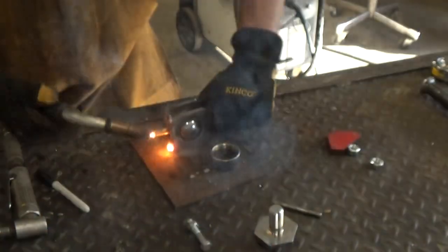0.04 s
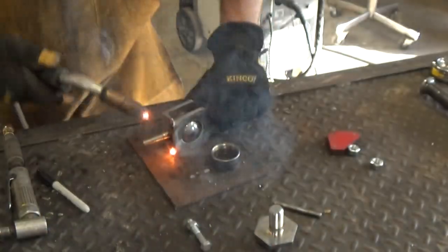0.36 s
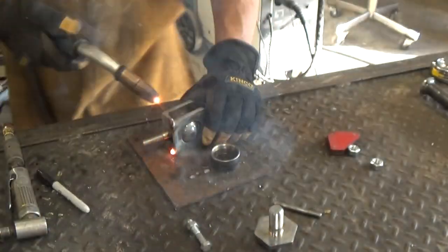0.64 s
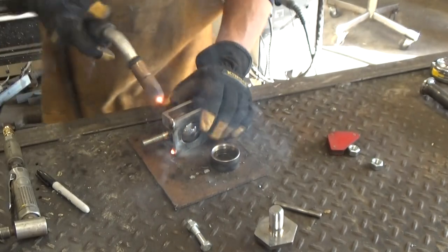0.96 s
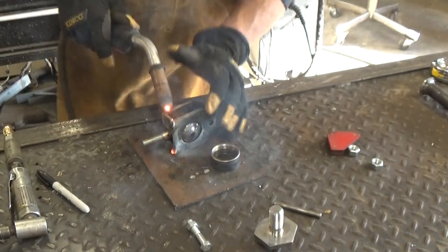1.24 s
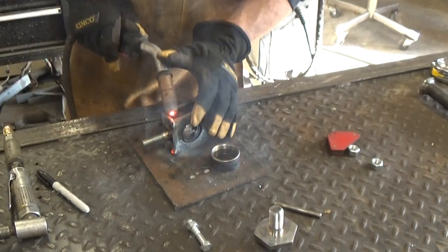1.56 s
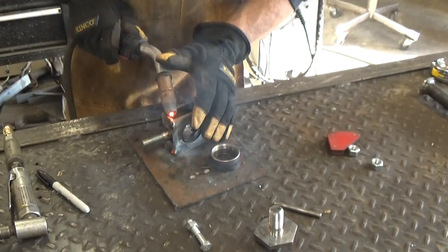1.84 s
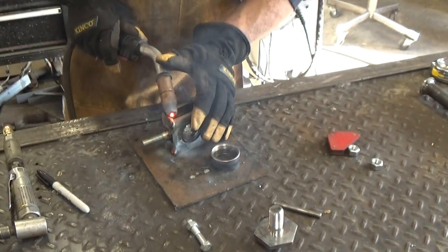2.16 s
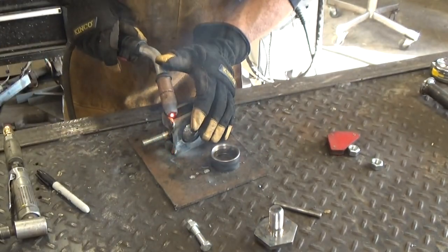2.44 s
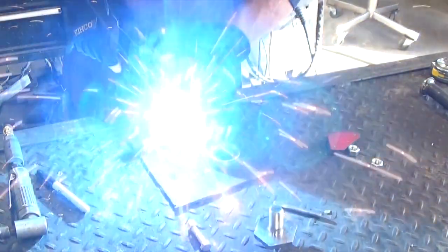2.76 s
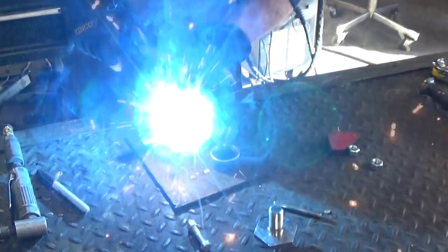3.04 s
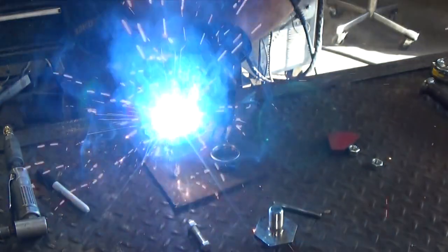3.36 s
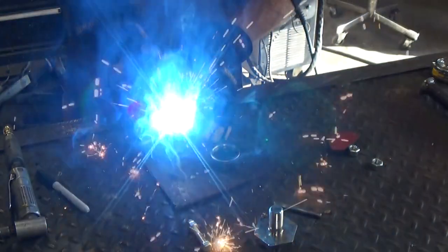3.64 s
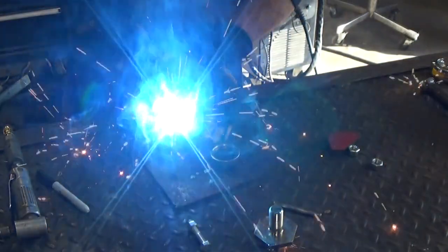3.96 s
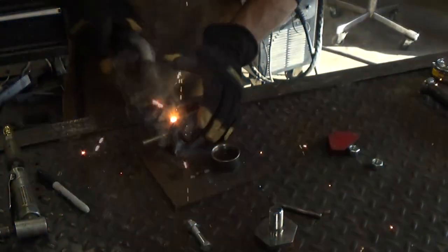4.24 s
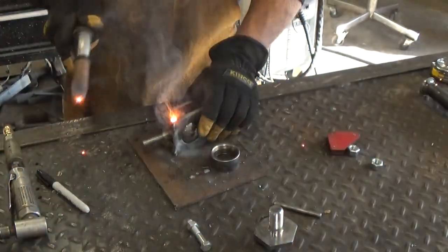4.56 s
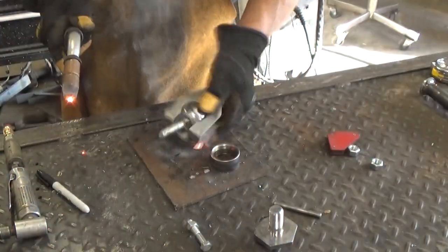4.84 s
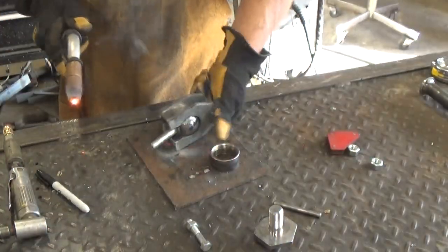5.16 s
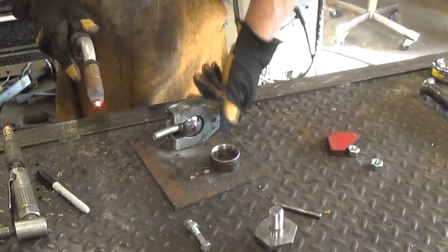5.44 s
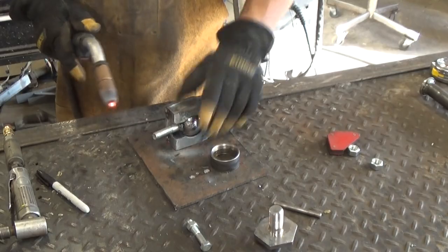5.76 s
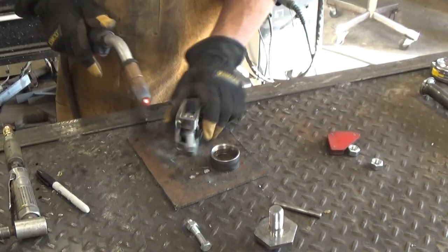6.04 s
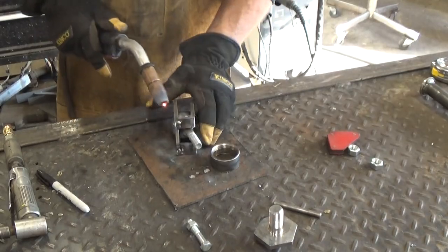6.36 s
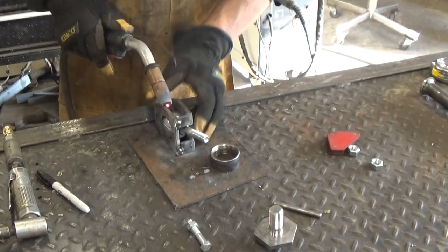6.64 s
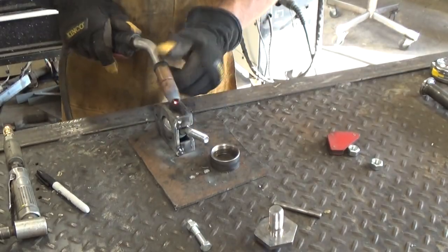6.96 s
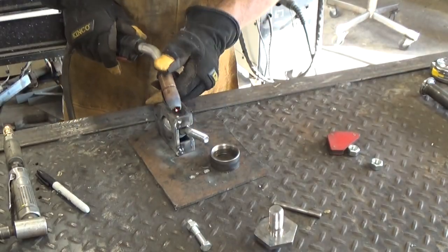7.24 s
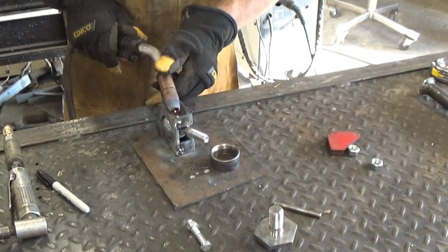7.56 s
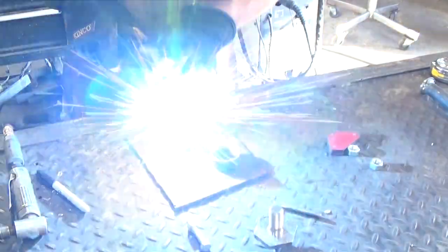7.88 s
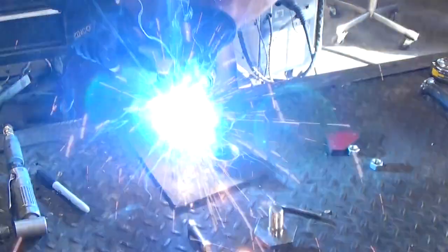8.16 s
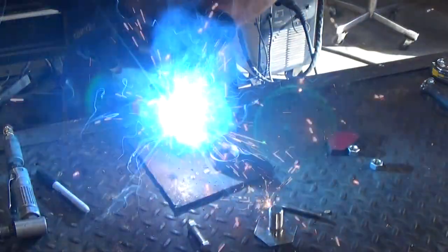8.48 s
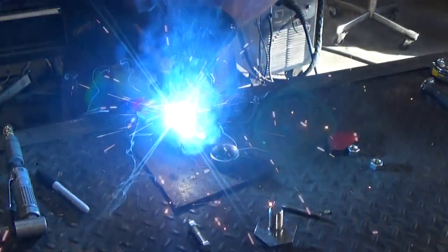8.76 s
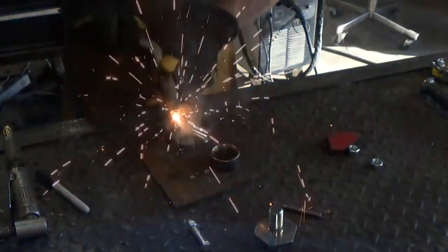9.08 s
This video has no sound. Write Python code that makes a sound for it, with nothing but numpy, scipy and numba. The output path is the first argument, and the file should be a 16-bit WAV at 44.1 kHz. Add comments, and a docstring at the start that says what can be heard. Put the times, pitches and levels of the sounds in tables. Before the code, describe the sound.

In a small workshop, a welding machine hums faintly under light metal taps and glove rustle. An arc strikes close by with sharp pops and runs as a fast, bright crackle and hiss for about a second and a half. A steel bracket then clanks over on a steel bench, clinks and slides briefly into place. After a short lull, a second weld of similar length crackles.

```python
"""Two short MIG welds in a small workshop

Close by, the welding wire dips into the melted steel about 115 times a second. Each dip is a short
circuit: it hushes the hiss of the electric arc and ends in a sharp pop. Between the two welds a gloved
hand tips a steel bracket over on the steel bench and slides it into place. The welder hums behind."""
import sys
import numpy as np
from scipy import signal
from scipy.fft import rfft, irfft
from scipy.io import wavfile
from scipy.ndimage import uniform_filter1d, minimum_filter1d, map_coordinates
from numba import njit

SR = 44100
rng = np.random.default_rng(int(sys.argv[2]) if len(sys.argv) > 2 else 0)


def to_wav(sig):
    """Store sig (one row per channel, or 1-D mono) as 16-bit WAV at the path in sys.argv[1].

    Samples outside -1..1 are clipped; the rate is SR.
    """
    pcm = np.clip(np.atleast_2d(sig), -1, 1) * 32767
    pcm = np.round(pcm).astype(np.int16)
    wavfile.write(sys.argv[1], SR, pcm.T)  # frames by channels


N = 410550
T = np.arange(N) / SR

# tone of the steel bench: f/Hz, level/dB
BENCH_COLOUR = [(25, -50), (45, -15), (70, -3.5), (95, -8), (135, -2.5), (200, -1.5), (300, -3),
                (420, -3.5), (800, -3.5), (1300, -5), (1750, -6), (2400, -8), (6000, -15.5), (10000, -20.5),
                (15000, -62)]
# notes the bracket rings at: f/Hz, level/dB, time to fade by 60 dB/s
BRACKET_MODES = [(2110, 0, .1), (4080, -4, .1), (4810, -4, .07), (5190, 1, .11), (5480, -4, .07),
                 (6050, -5, .06), (7620, -4, .12), (8290, -8, .1), (9410, -5, .07), (9990, -3, .12),
                 (10600, -2, .09), (11400, 2, .08), (11650, -2, .1), (13000, -7, .1)]
# the welds: wire touches/s, arc lights/s, last short/s, arc dies/s, hiss/dB, pop on lighting/dB
WELDS = [(2.530, 2.684, 4.195, 4.26, -22, 8.5), (7.823, 7.958, 9.32, 9.4, -22.5, -1)]
# flares, where the shorts pause and the hiss swells until a big drop bursts:
# start/s, burst/s, peak hiss/dB, burst level/dB
FLARES = [(2.679, 2.727, -14.5, 5.5), (2.782, 2.836, -19, 6), (4.086, 4.107, -18.5, 5),
          (4.109, 4.129, -18.5, 2), (4.131, 4.155, -15.5, 5), (7.958, 8.01, -16, 14.5),
          (8.013, 8.051, -21.5, 10), (8.056, 8.105, -16, 6), (8.779, 8.816, -18, -14),
          (8.962, 9.028, -20.5, 4), (9.032, 9.056, -39, 6), (9.14, 9.185, -39, 2), (9.188, 9.218, -37, 5)]


def undb(db):
    """Turn decibels into a gain."""
    return 10 ** (np.asarray(db) / 20)


def unit(x):
    """Scale a signal to an average (rms) level of 1."""
    return x / np.sqrt(np.mean(x ** 2))


def at(points, hz):
    """Read a curve of (f/Hz, value) points along a pitch scale."""
    f, value = np.transpose(points)
    return np.interp(np.log(hz + 1), np.log(f), value)


def colour(x, points, tilt_db=0, size=4096):
    """Shape the tone by (f/Hz, level/dB) points, adding tilt_db per octave either side of 250 Hz."""
    hz = np.linspace(1, SR / 2, size // 2 + 1)
    octaves = np.abs(np.log2(np.maximum(hz, 40) / 250))
    cepstrum = irfft(np.log(undb(at(points, hz) + tilt_db * octaves)))
    # folding keeps the filter from sounding ahead of its input
    cepstrum[1:size // 2] *= 2
    cepstrum[size // 2 + 1:] = 0
    response = irfft(np.exp(rfft(cepstrum)))
    return signal.oaconvolve(x, response / np.linalg.norm(response))[:len(x)]


@njit
def moving_band(x, hz, width_hz):
    """Let through one band of pitches, whose centre hz is given for each sample."""
    y, band_state, low_state = np.empty(len(x)), 0., 0.
    for i in range(len(x)):
        step, damping = np.tan(np.pi * hz[i] / SR), width_hz / hz[i]
        band = (band_state + step * (x[i] + 1e-18 - low_state)) / (1 + step * (step + damping))
        band_state = 2 * band - band_state
        low_state += 2 * step * band
        y[i] = damping * band
    return y


def resonate(x, hz, width_hz):
    """The part of x that rings around hz, a steady or a moving pitch."""
    return moving_band(x, hz * np.ones(len(x)), float(width_hz))


def walk(rate):
    """A smooth random wander of size 1 that turns about rate times a second."""
    step = int(SR / rate)
    points = rng.standard_normal(N // step + 2)
    path = np.interp(np.arange(N) / step, np.arange(len(points)), points)
    return unit(uniform_filter1d(path, step // 2 + 1))


def swell(start, end, attack_s, release_s):
    """Fade in, hold and fade out between two times."""
    return np.clip(np.minimum((T - start) / attack_s, (end - T) / release_s), 0, 1)


def add(out, s, sound):
    """Mix a sound in at s seconds."""
    i = int(s * SR)
    out[..., i:i + sound.shape[-1]] += sound[..., :N - i]


def stereo(mid, side, side_db):
    """Make left and right from what they share (mid) and what sets them apart (side)."""
    return mid + undb(side_db) * side * np.array([[1], [-1]])


def ring(modes, t, scatter_db=2):
    """Struck steel rings at several fading notes, each with a random share of the blow."""
    hz, db, t60 = np.transpose(modes)[:, :, None]
    gain = undb(db + scatter_db * rng.standard_normal(hz.shape)) * rng.choice([-1, 1], hz.shape)
    notes = gain * np.sin(2 * np.pi * hz * t) * np.exp(-np.log(1000) * t / t60)
    return notes.sum(0) / np.linalg.norm(gain)


def wash(size=32768):
    """Bench and shop ring at so many notes that they blur into noise; the treble dies first."""
    # how long they ring: f/Hz, time to fade by 60 dB/s
    fade_times = [(100, 0.49), (500, 0.57), (3000, 0.47), (7000, 0.32), (14000, 0.24)]
    t, hz = np.arange(size) / SR, np.linspace(1, SR / 2, size // 2 + 1)
    spectrum, out = rfft(rng.standard_normal(size)), 0
    for band_hz, t60 in fade_times:
        share = at([(f, f == band_hz) for f, _ in fade_times], hz)
        out = out + irfft(spectrum * share) * np.exp(-np.log(1000) * t / t60)
    return out


def in_shop(x, wet_db):
    """A close sound, followed 5 ms later by the ringing of the shop at wet_db."""
    tail = stereo(wash(), wash(), side_db=-5.5)
    tail = np.pad(tail / np.linalg.norm(tail[0]), ((0, 0), (SR // 200, 0)))
    return x + undb(wet_db) * signal.oaconvolve(x[None], tail, axes=1)[:, :N]


def welder(hum_hz=117.7, hum_db=-61, hum_wander_db=3, fan_hz=30, air_db=-58):
    """The welder's mains hum and its fan, which chirps once a turn, over the air of the shop."""
    # squeak of the fan: f/Hz, level/dB
    fan_tones = [(3090, -61), (4000, -70)]
    # steady noise of the shop: f/Hz, level/dB
    air_colour = [(25, -21), (60, -7), (96, -10.5), (129, 0), (204, -14.5), (350, -16), (500, -16.5),
                  (750, -17.5), (1500, -24.5), (2300, -23.5), (3100, -24.5), (4900, -29), (10000, -31.5),
                  (15500, -35)]
    hum = np.sqrt(2) * np.sin(2 * np.pi * hum_hz * T + .5 * walk(15))
    hum *= undb(hum_db + hum_wander_db * walk(20))
    once_a_turn = np.exp(4 * (np.cos(2 * np.pi * fan_hz * T) - 1))
    squeak = sum(np.sqrt(2) * undb(db + 1.2 * walk(30)) * np.sin(2 * np.pi * hz * T + .9 * walk(250))
                 for hz, db in fan_tones)
    mid, side = (unit(colour(rng.standard_normal(N), air_colour)) for _ in range(2))
    return hum + once_a_turn * squeak + undb(air_db) * stereo(mid, side, side_db=-6)


def gloves(attack_share=.32, release_share=.48):
    """Leather gloves and apron rub with a soft, grainy rustle."""
    # tone of the leather: f/Hz, level/dB
    leather_colour = [(200, -14), (400, -11.5), (520, -5), (700, -12), (1500, -12.5), (3500, -12),
                      (7700, -18), (10500, -13.5), (15000, -25.5)]
    # movements: start/s, length/s, level/dB
    strokes = [(0.408, 0.11, -50), (0.436, 1.45, -56.5), (1.18, 0.27, -60.5), (2.256, 0.059, -64),
               (4.588, 0.24, -50.5), (4.87, 0.23, -55), (5.05, .6, -48), (5.833, .06, -52.5),
               (5.863, 0.63, -47), (6.386, 0.64, -53), (6.84, 0.43, -58)]
    grain = undb(2 * walk(300) + walk(30))
    rub = colour(rng.standard_normal(N) * grain, leather_colour)
    motion = sum(undb(db) * swell(s, s + length, attack_share * length, release_share * length)
                 for s, length, db in strokes)
    return in_shop(unit(rub) * motion, wet_db=-7)


def slides(slips_per_s=350, groan_hz=440, groan_db=9, chatter_db=-13):
    """The bracket moves in tiny slips over rough steel: the bench groans and the bracket chatters."""
    # drags across the bench: start/s, end/s, level/dB
    drags = [(0.11, 0.334, -44), (6.43, 6.69, -34.5)]
    slips = rng.standard_normal(N) * (rng.random(N) < slips_per_s / SR)
    body = colour(slips, BENCH_COLOUR, tilt_db=-3.5)
    groan = resonate(body, groan_hz, width_hz=113)
    chatter = signal.oaconvolve(slips, ring(BRACKET_MODES, T[:SR // 10]))[:N]
    scrape = unit(body + undb(groan_db) * groan) + undb(chatter_db) * unit(chatter)
    push = sum(undb(db) * swell(start, end, attack_s=.067, release_s=.076) for start, end, db in drags)
    return in_shop(scrape * push, wet_db=-1.5)


def knocks(crack_db=4, crack_s=.0042, wash_db=-4, bench_ring_db=-10, clink_s=.01, bracket_ring_db=1):
    """The bracket hits the bench: a first contact and a short rattle set both ringing."""
    # blows: t/s, bench/dB, clink/dB, tilt/dB per octave, rattle fade/s, favoured f/Hz, its level/dB
    blows = [(0.099, -46.5, -58, 3, 0.0043, 1800, 2), (0.188, -42.5, -35.5, 5.5, 0.0023, 2150, 11),
             (0.741, -54, -72, -2, .0003, 563, 16), (1.204, -49.5, -56, .5, .0017, 1700, -3),
             (2.508, -46, -68, -4.5, .002, 2000, 9), (4.669, -44.5, -37.5, -5, 0.022, 4080, 12),
             (4.767, -38, -37.5, -3.5, 0.026, 4080, 16.5), (5.121, -16, -33, .5, 0.013, 1100, -12),
             (5.134, -12.5, -25, 0.4, 0.03, 760, -2.5), (5.319, -30, -55, -5.5, 0.0045, 800, -7),
             (5.389, -17.5, -28.5, -2.5, 0.0029, 277, -10), (5.417, -23.5, -28, -1, 0.00042, 1950, 15),
             (5.914, -49, -48, -3, 0.0088, 2130, 15.5), (5.999, -34.5, -53, -4, 0.0092, 272, 9),
             (6.037, -27.5, -31.5, -1.5, 0.011, 238, 11), (6.147, -20.5, -35, -2.5, .0008, 770, 5),
             (6.257, -36.5, -32, -1, 0.0014, 5070, 11), (6.428, -39, -41.5, -1.5, 0.014, 2000, -1),
             (6.457, -36.5, -31.5, -4.5, 0.0023, 1980, 12), (6.493, -34.5, -35, -0.5, 0.012, 1130, 7),
             (6.558, -30.5, -29.5, 2.5, 0.021, 480, -3), (6.634, -37, -28, 6.5, 0.013, 450, 16)]
    # notes the bench rings at: f/Hz, level/dB, time to fade by 60 dB/s
    bench_modes = [(129.2, 1.5, 1), (248, 6, 0.36), (322, -3, 0.55), (391, -23, .25), (705.6, 6, .35),
                   (779, -8.5, .43), (1000, -5, 0.71), (1117, 3, 0.65), (1273, -23.5, 0.3),
                   (1690, -4.5, .29), (2094, -14.5, .42)]
    # tone of the bracket's clink: f/Hz, level/dB
    clink_colour = [(800, -23.5), (2200, -2), (5000, -1), (8500, -4.5), (11400, -4.5), (15000, -21.5)]
    bench, clinks = np.zeros((2, N)), np.zeros(N)
    for s, bench_db, clink_db, tilt_db, rattle_s, spot_hz, spot_db in blows:
        blur = undb(wash_db) * wash()
        t = T[:len(blur)]
        brief = t[:len(t) // 4]
        contacts = rng.standard_normal(len(brief)) * (rng.random(len(brief)) < .02)
        contacts *= np.exp(-brief / rattle_s)
        contacts[0] = 2  # the first hit
        contacts /= np.linalg.norm(contacts)
        crack = undb(crack_db) * rng.standard_normal(len(t)) * np.exp(-t / crack_s)
        mid = colour(blur + crack, BENCH_COLOUR, tilt_db) + undb(bench_ring_db) * ring(bench_modes, t)
        # the spot that is struck favours one band at first
        mid += undb(spot_db) * resonate(mid, spot_hz, width_hz=spot_hz / 4) * np.exp(-t / .062)
        body = stereo(mid, colour(wash(), BENCH_COLOUR, tilt_db), side_db=-11.5)
        add(bench, s, undb(bench_db) * signal.fftconvolve(body, contacts[None], axes=1))
        clink = colour(rng.standard_normal(len(brief)) * np.exp(-brief / clink_s), clink_colour)
        clink += undb(bracket_ring_db) * ring(BRACKET_MODES, brief)
        add(clinks, s, undb(clink_db) * signal.fftconvolve(clink, contacts))
    return bench + in_shop(clinks, wet_db=-15)


def rushes(low_db=2.5, high_db=2):
    """Near the start and end of each weld, a dull rush of noise swells and then rings away."""
    # rushes: peak/s, end/s, level/dB, rise/s, tilt/dB per octave, low ring/Hz, high ring/Hz
    surges = [(2.566, 2.688, -19, 0.0057, 1.5, 374, 3900), (4.261, 4.696, -20, 0.0083, 2.5, 1060, 3100),
              (7.854, 7.954, -21, 0.0048, 2, 726, 3970)]
    # their tone: f/Hz, level/dB
    rush_colour = [(50, -40), (130, -6.5), (300, -4.5), (700, 0), (1300, -6), (2000, -6.5), (2700, -10),
                   (3600, -5.5), (4900, -6.5), (6200, -15.5), (9500, -12.5), (13500, -20.5), (15500, -31.5)]
    out, lead = np.zeros((2, N)), T[:SR // 20]
    for peak, end, db, rise_s, tilt_db, low_hz, high_hz in surges:
        start = peak - lead[-1]
        rise = np.exp((lead - lead[-1]) / rise_s)
        noises = [np.r_[rise * rng.standard_normal(len(lead)), wash()] for _ in range(2)]
        mid, side = (colour(noise, rush_colour, tilt_db) for noise in noises)
        low_ring = undb(low_db) * resonate(mid, low_hz, width_hz=200)
        high_ring = undb(high_db) * resonate(mid, high_hz, width_hz=400)
        rush = stereo(mid + low_ring + high_ring, side, side_db=-9.5)
        add(out, start, undb(db) * rush[:, :int((end - start) * SR)])
    return out


def hiss_level(cold_db=-6.5, warm_s=.15, waver_db=1, flare_rise_db=17.5, drop_short_s=.003):
    """The hiss builds as the steel warms, swells in each flare and fades as the arc is drawn away."""
    gain = np.zeros(N)
    for _, lit, _, dies, db, _ in WELDS:
        cold = np.exp(-np.maximum(T - lit, 0) / warm_s)
        gain += undb(db + cold_db * cold) * swell(lit, dies, attack_s=.01, release_s=.046)
    gain *= undb(waver_db * walk(25))
    for start, burst, db, _ in FLARES:
        # the swell stops when the drop bridges the gap, just before it bursts
        growing = (T > start) & (T < burst - drop_short_s)
        to_go = (burst - T[growing]) / (burst - start)
        gain[growing] = np.hypot(gain[growing], undb(db - flare_rise_db * to_go ** 2))
    return gain


def run_of_shorts(start, end, hang_chance=.03, period_scatter=.065, scatter_db=2.7, max_pops=200):
    """A nearly even run of pops; now and then a drop hangs on and skips a beat."""
    # pace as the torch nears and leaves the melted steel: t/s, rate/pops per s, level/dB
    pace = [(2.86, 117, -1), (3.22, 115, -1), (3.33, 89, -1.5), (3.45, 115, 2), (3.87, 116, -1.5),
            (3.98, 92, -1), (4.191, 109, -1.5), (8.15, 96, 0.5), (8.4, 108.6, -1), (9.101, 106, -3.5),
            (9.3, 99, 2)]
    times, rates, levels = np.transpose(pace)
    pops, s = [], start
    scatter = rng.standard_normal((max_pops, 2))
    for (stretch, size), hangs in zip(scatter, rng.random(max_pops) < hang_chance):
        period = np.exp(period_scatter * stretch) * (1 + hangs) / np.interp(s, times, rates)
        if end - s < period / 2:
            break
        s = s + period if end - s > 1.5 * period else end
        pops.append((s, np.interp(s, times, levels) + scatter_db * size))
    return pops


def shorts(touch_db=-26, stutters=3, stutter_s=.0082, step_db=10.5):
    """All pops as (t/s, level/dB): the wire ticks on the steel, stutters alight, then runs on."""
    pops = [(burst, db) for _, burst, _, db in FLARES]
    for touch, lit, last, dies, _, db in WELDS:
        pops.append((touch, touch_db))
        pops += [(lit - k * stutter_s, db - k * step_db) for k in range(stutters)]
        run_start = lit
        for pause, burst, _, _ in FLARES:
            if touch < pause < dies:
                pops += run_of_shorts(run_start, pause)
                run_start = burst
        pops += run_of_shorts(run_start, last)
    return [(s, db) for s, db in pops if s < T[-1]]


def nozzle_ring(x):
    """The space around the arc rings; the upper pitches rise as the torch nozzle's gap closes."""
    # ringing bands: base f/Hz, width/Hz, level/dB, share in the pitch drift/0-1
    bands = [(2980, 450, -12, 1), (3976, 160, 3.5, 0.18), (4610, 375, 7.5, 0), (6396, 190, 3, 0.07),
             (7050, 450, 0.5, 0), (9240, 1300, 0, 1), (11250, 880, 9, 1), (13070, 540, 0.5, 1)]
    # pitch drift along each weld: t/s, frequency factor
    drift = [(2.7, .99), (3.2, 1), (3.7, 1.055), (4.2, 1.06), (7.9, 1), (8.7, 1.02), (9.3, 1.055)]
    tuning = np.interp(T, *np.transpose(drift))
    return x + sum(undb(db) * resonate(x, hz * tuning ** share, width) for hz, width, db, share in bands)


def near_echoes(x, above_hz=2300, oversample=4):
    """Small surfaces nearby throw back only the treble; the delays wander as the torch moves."""
    # echoes off plate, glove and bench: delay/ms, level/dB, wander/ms
    echoes = [(.3, -4.5, .003), (1.45, -16, .008), (2.45, -12, .008)]
    treble = signal.sosfiltfilt(signal.butter(4, above_hz, "high", fs=SR, output="sos"), x)
    fine = signal.resample_poly(treble, oversample, 1)
    for delay_ms, db, wander_ms in echoes:
        delay_s = (delay_ms + wander_ms * walk(2.5)) / 1000
        x = x + undb(db) * map_coordinates(fine, [(T - delay_s) * oversample * SR], order=1)
    return x


def arc(fizz_db=-24.5, fizz_s=.0011, short_s=.0025, hush_db=-5, hiss_db=-5.5, grain_db=2):
    """Each short hushes the arc's hiss; then the bridge of melted metal bursts with a pop."""
    # tone of the pops: f/Hz, level/dB
    pop_colour = [(60, -40), (130, -6.5), (500, -1), (1400, 0), (2150, -4), (2700, -0.5), (4300, -0.5),
                  (5500, 4), (7000, -1.5), (8200, 4), (9800, 2), (11300, 3.5), (13800, -0.5), (15500, -7.5)]
    # tone of the hiss: f/Hz, level/dB
    hiss_colour = [(60, -16.5), (130, 3), (300, 1), (1400, 0.5), (2100, 1), (3000, -1.5), (4300, -9.5),
                   (5500, 0), (7000, -5), (8200, 8), (9800, 1), (11300, 1.5), (13800, -2.5), (15500, 1)]
    pops, shorted = np.zeros(N), np.zeros(N)
    t = T[:SR // 100]
    spike = 1.15 * (t == 0)  # the jump in air pressure at the burst
    for s, db in shorts():
        spatter_fizz = undb(fizz_db) * rng.standard_normal(len(t)) * np.exp(-t / fizz_s)
        add(pops, s, undb(db) * (spike + spatter_fizz))
        add(shorted, s - short_s, np.ones(int(short_s * SR)))
    hiss = unit(rng.standard_normal(N) * undb(grain_db * walk(1500))) * hiss_level()
    hiss *= undb(hiss_db + hush_db * np.minimum(shorted, 1))
    crackle = colour(pops, pop_colour) + colour(hiss, hiss_colour)
    return near_echoes(nozzle_ring(crackle))


def scene():
    """The welding, the handling of the bracket and the welder behind, mixed in stereo."""
    return in_shop(arc(), wet_db=-11) + rushes() + knocks() + slides() + gloves() + welder()


def record(dry, width_db=-2.7, ceiling=.75, cutoff_hz=15750):
    """Two close microphones share the bass; a fast limiter evens the pops; the top treble is cut."""
    # tone of what sets left and right apart: f/Hz, level/dB
    side_colour = [(80, -16), (180, -10), (350, -4), (700, -0.5), (1400, 4), (2800, 2), (5600, 0.5),
                   (11000, -6), (16000, -3.5)]
    side = colour((dry[0] - dry[1]) / 2, side_colour)
    x = stereo(dry.mean(0), side, side_db=width_db)
    hold = SR // 1000  # 1 ms
    needed_gain = ceiling / np.maximum(np.abs(x).max(0), ceiling)
    gain = uniform_filter1d(minimum_filter1d(needed_gain, hold), hold)
    return signal.sosfilt(signal.ellip(10, .2, 80, cutoff_hz, fs=SR, output="sos"), x * gain)


dry = scene()
out = record(dry)
to_wav(out)
```